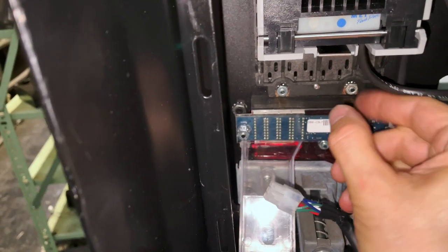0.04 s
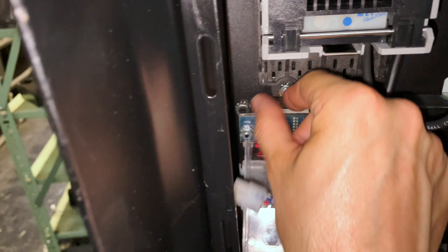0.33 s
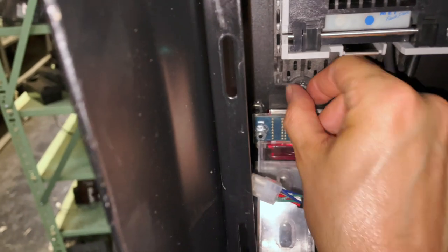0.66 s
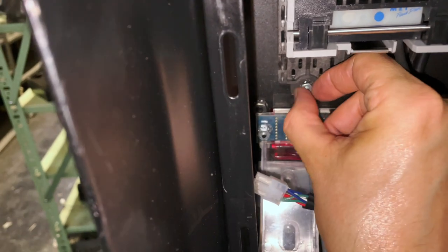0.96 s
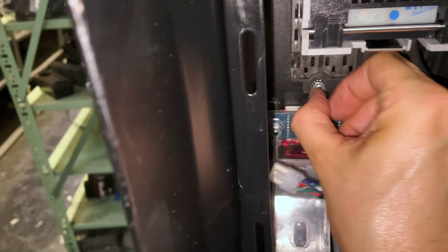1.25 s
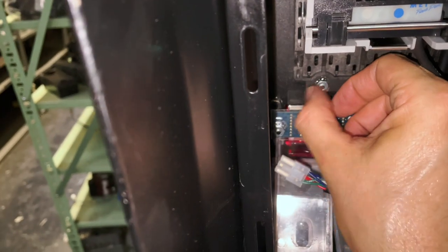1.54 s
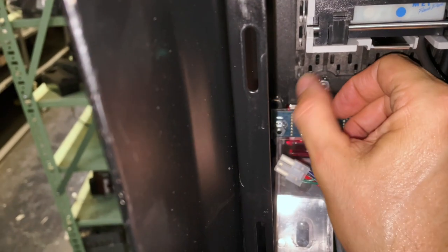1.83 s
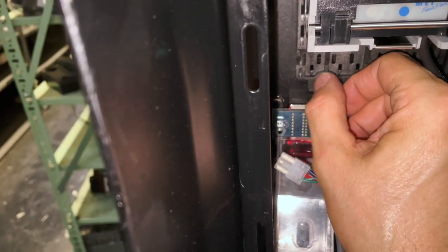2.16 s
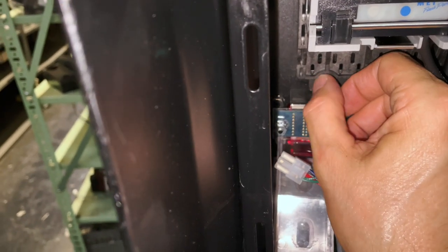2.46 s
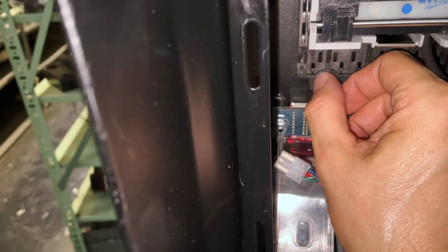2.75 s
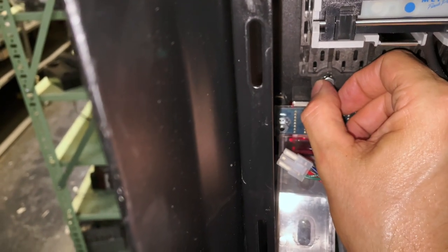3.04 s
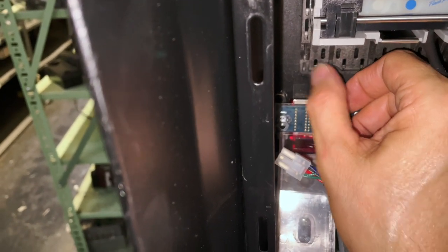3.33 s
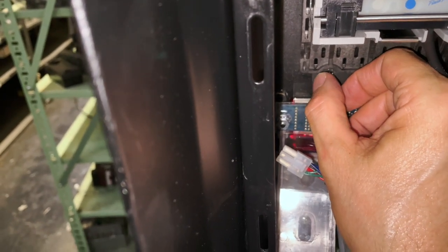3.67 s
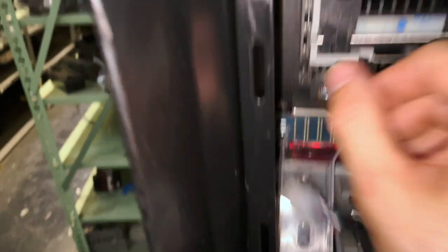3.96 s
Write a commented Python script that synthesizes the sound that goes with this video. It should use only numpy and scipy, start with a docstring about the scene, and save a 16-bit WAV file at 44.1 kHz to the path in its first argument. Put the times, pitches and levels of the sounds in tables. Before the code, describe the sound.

Close up, small metallic clicks and short scrapes come from a nut being threaded on by hand. Steel cabinet panels are brushed and knocked, fingertips squeak faintly, and the clicks grow sparse before a last bump, in a quietly humming workshop.

```python
"""Over a quiet workshop hum, fingers fit a small nut onto a screw inside a steel cabinet.
First the hand rubs and bumps the panels, which ring briefly, while the nut ticks and snaps. Its thread
rasps in short turns, and from about one second in the fingertips squeak on it. After a bright snap near
two seconds the turns and ticks thin out; a last rub and bump end the scene.
Two closely spaced microphones hear it all from near by."""
import sys
import numpy as np
from scipy import signal
from scipy.fft import rfft, irfft
from scipy.io import wavfile
from scipy.ndimage import uniform_filter1d

SR = 44100
rng = np.random.default_rng(int(sys.argv[2]) if len(sys.argv) > 2 else 0)


def wav_record(signal):
    """Record a signal, one row per channel, as 16-bit PCM in the file named by sys.argv[1]."""
    frames = np.transpose(np.atleast_2d(signal))
    bounded = np.clip(frames, -1, 1)
    # unit amplitude maps onto the largest positive 16-bit level
    quanta = np.round(bounded * 32767).astype(np.int16)
    wavfile.write(sys.argv[1], SR, quanta)


N = 176400
T = np.arange(N) / SR


def from_db(db):
    """Decibels to gain."""
    return 10 ** (np.asarray(db) / 20)


def rms_one(x):
    """Scale to unit rms."""
    return x / np.sqrt(np.mean(x ** 2) + 1e-20)


def decay(age, t60):
    """Envelope that falls 60 dB in t60 seconds."""
    return np.exp(-np.log(1000) * age / t60)


def at_hz(points, hz):
    """Read a curve on a log-frequency axis."""
    f, value = np.transpose(points)
    return np.interp(np.log(hz + 1), np.log(f), value)


def band(x, low_hz, high_hz):
    """Gentle band-pass."""
    sos = signal.butter(2, [low_hz, high_hz], "band", fs=SR, output="sos")
    return signal.sosfilt(sos, x + 1e-18)


def colour(x, spectrum):
    """Shape a noise with an EQ curve."""
    return irfft(rfft(x) * from_db(at_hz(spectrum, np.fft.rfftfreq(N, 1 / SR))), N)


def resonance(x, hz, t60):
    """One ringing mode, with gain 1 at its centre."""
    r = decay(1 / SR, t60)
    poles = [1, -2 * r * np.cos(2 * np.pi * hz / SR), r * r]
    return signal.lfilter((1 - r * r) / 2 * np.array([1, 0, -1]), poles, x + 1e-18)


def grains(per_s, spread_db):
    """Rough surfaces catching: tiny random impacts, made uneven by spread_db."""
    sizes = from_db(spread_db * np.minimum(rng.exponential(1, N), 4)) * rng.choice([-1, 1], N)
    return sizes * (rng.random(N) < per_s / SR)


def rustle(low_hz, high_hz, pitches=16, ring_cycles=17.3):
    """Many soft catches, each ringing briefly at one of a spread of pitches; rms 1."""
    catches = sum(resonance(grains(2000 / pitches, spread_db=2.5), hz, ring_cycles / hz) / np.sqrt(hz)
                  for hz in np.geomspace(low_hz, high_hz, pitches))
    return rms_one(band(catches, low_hz, high_hz))


def waver():
    """Quick irregular wobble of a part held in the fingers; rms 1."""
    return rms_one(band(rng.standard_normal(N), 33.3, 245))


def workshop():
    """A bed of distant machinery: rumble, a low hum and faint hiss."""
    # room tone spectrum: f/Hz, level/dB
    room_tone = [(20,-44),(35,-13),(58,5),(90,-5.5),(160,-13),(250,-19.5),(550,-35),(3000,-47),(7000,-54.5),(10500,-49),(15000,-61)]
    # its stereo width: f/Hz, side level/dB
    width = [(40,-26.5),(120,-9.5),(1500,-15)]
    mid, side = rng.standard_normal((2, N))
    air = colour(mid + colour(side, width) * [[1], [-1]], room_tone)
    hum = np.sin(2 * np.pi * 58.4 * T)
    return from_db(-49) * rms_one(air) + from_db(-52) * hum


def reflections(x, t60, band_hz):
    """A dense reverb tail, different at each microphone."""
    age = T[:SR // 2]
    tail = rng.standard_normal((2, len(age))) * decay(age, t60) * (age > .002)
    tail /= np.sqrt(np.sum(tail ** 2, axis=1, keepdims=True))
    return signal.fftconvolve(x[None], band(tail, *band_hz), axes=1)[:, :N]


def cabinet(x):
    """The steel box rings along at its modes."""
    # cabinet modes: f/Hz, level/dB, t60/s
    modes = [(518,5,0.176),(845,-1,0.18),(920,4.5,0.044),(2120,1,0.036),(3170,-0.5,0.015),(6424,-3.5,0.015)]
    return x + sum(from_db(db) * resonance(x, hz, t60) for hz, db, t60 in modes)


def sheet_metal(x):
    """Countless close, short resonances of the sheet give the contacts a tinny colour."""
    age = T[:SR // 8]
    ringing = rng.standard_normal(len(age)) * decay(age, t60=0.0055)
    response = from_db(3) * band(ringing / np.linalg.norm(ringing), 2170, 13600)
    response[0] += 1   # the direct sound
    spectrum = rfft(response)
    spectrum /= np.sqrt(uniform_filter1d(np.abs(spectrum) ** 2, size=100))   # keep the broad balance flat
    return signal.fftconvolve(x, irfft(spectrum)[:len(age) // 2])[:N]


def hand_rubs(fade_s=0.013):
    """Skin drags over the panels with a dull, grainy rustle."""
    # one envelope per rub, its points: t/s, bass level/dB, middle level/dB
    strokes = [
        [(0.0, -98, -50), (0.11, -31.5, -45.5), (0.47, -49.5, -75)],
        [(0.52, -45.5, -49), (0.7, -51, -68.5), (0.72, -48, -51)],
        [(0.92, -51.5, -62), (1.14, -46.5, -51.5), (1.42, -39.5, -74)],
        [(1.56, -46, -103), (1.716, -52.5, -57.5), (1.85, -44, -87)],
        [(3.78, -56, -64), (3.846, -48, -54), (4.0, -51.5, -51.5)],
    ]
    # bass, middle and treble of the rustle: low f/Hz, high f/Hz, trim/dB
    layers = [(54,265,-4.5),(377,1630,0),(1550,7660,-12.5)]
    out = np.zeros(N)
    for k, (low_hz, high_hz, trim_db) in enumerate(layers):
        envelope = 0
        for stroke in strokes:
            times, bass_db, middle_db = np.transpose(stroke)
            db = np.interp(T, times, bass_db if k == 0 else middle_db)   # the treble follows the middle
            outside_s = np.maximum(times[0] - T, T - times[-1]).clip(0)
            envelope += from_db(db + trim_db) * (1 - outside_s / fade_s).clip(0)
        out += envelope * rustle(low_hz, high_hz)
    return out


def bumps(rise_share=0.12):
    """A touched panel or small part rings briefly; the fingers damp it and bend its pitch."""
    # parts set ringing: t/s, f/Hz, level/dB, t60/s
    rings = [(.046,925,-20,0.018),(.097,420,-23,0.058),(0.1,173,-18,0.062),(0.0983,1630,-15.5,0.015),(0.167,1590,-30,.025),(0.213,1694,-21,0.014),(.219,827,-31.5,0.24),(0.331,847,-22,0.036),(.338,397,-29.5,0.06),(0.538,390,-17,0.027),(0.599,409,-17.5,0.018),(1.075,2137,-25,0.018),(1.162,3437,-26,0.024),(1.32,327,-28.5,0.07),(1.566,190.4,-28,0.2),(1.572,525,-44.5,0.21),(3.852,1470,-16.5,0.011),(3.851,960,-21.5,0.015),(3.946,4020,-50,0.082)]
    out = np.zeros(N)
    bend = 1 + 0.012 * waver()
    for s, hz, db, t60 in rings:
        start = int(s * SR)
        age = T[:N - start][:SR // 3]
        span = slice(start, start + len(age))
        envelope = (1 - np.exp(-age / (rise_share * t60))) * decay(age, t60)
        out[span] += from_db(db) * envelope * np.sin(2 * np.pi * hz * np.cumsum(bend[span]) / SR)
    return out


def finger_squeaks():
    """Skin sticks and slips on the nut: a rough tone that glides down as the grip changes."""
    # fingertip slips: t/s, length/s, first f/Hz, last f/Hz, level/dB
    slips = [(0.953,0.1,1936,1730,-56),(0.978,0.14,1365,1156,-50.5),(1.211,.055,1690,1160,-41.5),(1.275,0.05,1100,868,-52.5)]
    out = np.zeros(N)
    wobble = 1 + .05 * waver()
    for s, length, first_hz, last_hz, db in slips:
        progress = ((T - s) / length).clip(0, 1)
        hz = first_hz * (last_hz / first_hz) ** progress * wobble
        envelope = np.sin(np.pi * np.sqrt(progress))
        out += from_db(db) * envelope * np.sin(2 * np.pi * np.cumsum(hz) / SR)
    return out * (1 + .5 * waver())   # the level flutters


def nut_snaps(t60=0.004):
    """The nut's edge lets go of the thread with a tiny, very bright crack."""
    # snaps over the thread: t/s, level/dB
    snaps = [(0.085,-34),(0.296,-14),(0.882,-24),(0.955,-35),(1.486,-35),(1.9103,-15)]
    envelope = sum(from_db(db - 60 * ((T - s) / t60).clip(0, 2)) * (T >= s) for s, db in snaps)
    return band(envelope * rng.standard_normal(N), 10000, 16300)


def thread_rasp():
    """The thread catches and sets the nut ringing; the rasp swells and dies with each turn."""
    # turns of the nut: peak t/s, rise/s, fall/s, level/dB
    turns = [(0.089,0.012,0.036,-48),(.268,0.012,0.015,-44),(0.581,0.016,0.014,-49),(0.761,0.063,0.035,-55.5),(0.873,0.0056,0.0082,-50),(1.008,0.052,0.023,-52.5),(1.221,0.045,0.029,-46),(1.464,0.01,0.018,-47.5),(1.554,0.0046,0.0099,-36.5),(1.752,0.014,0.016,-43.5),(1.799,0.023,0.0074,-52.5),(1.968,0.029,0.015,-44),(2.054,0.008,0.016,-56.5),(2.239,0.012,0.013,-40),(2.348,.004,.012,-62),(2.532,0.014,0.021,-45.5),(2.625,0.0072,.015,-62.5),(2.819,0.02,0.021,-47.5),(3.198,0.0097,0.01,-56),(3.39,0.0074,0.058,-61)]
    # spectrum of the thread's grit: f/Hz, level/dB
    grit_eq = [(400,-17),(950,0),(1600,0.5),(2700,-11),(4000,-4.5),(6500,-10),(8200,-15.5),(10800,-5),(15500,-31)]
    effort = sum(from_db(db) * np.exp(-np.maximum((s - T) / rise, (T - s) / fall).clip(0, 20))
                 for s, rise, fall, db in turns)
    grit = rms_one(colour(grains(per_s=4000, spread_db=1.5), grit_eq))
    nut_ring = rustle(813, 5520)
    return effort * rms_one(grit + nut_ring)


def nut_ticks(attack_s=0.00029):
    """Each metal contact is a burst of chatter whose highs die fastest."""
    # contacts: t/s, treble level/dB, then relative to it body/dB, middle/dB, top/dB
    contacts = [(0.0159, -44.5, -1, 2.5, -10.5), (0.0455, -44, 1, 5.5, -36),
                (0.0849, -17, -12.5, -21.5, -17.5), (0.0934, -29, -26, 2, -13),
                (0.2107, -29, -3.5, 3.5, -43), (0.2275, -36, -1, 2.5, -42), (0.297, -20, -26, -19.5, -9.5),
                (0.329, -34.5, 2, -1, -31), (0.5039, -49.5, 4.5, 7.5, -12),
                (0.525, -38.5, -6.5, -10.5, -22), (0.8793, -35, -7.5, -3, -16),
                (0.9832, -31.5, -10.5, -19, -21), (1.074, -30, -35, -11, -44),
                (1.2192, -22.5, -17.5, -23, -18), (1.2982, -41.5, 2.5, 1, -41),
                (1.3794, -33.5, -48, -10.5, -51), (1.454, -33.5, -13.5, -10.5, -44),
                (1.465, -40.5, -35, 0, -35), (1.5498, -19.5, -14, -11, -21),
                (1.648, -39.5, -9.5, -4.5, -23), (1.7413, -30, -14, -12.5, -18.5),
                (1.9084, -28.5, -15, -10, -2.5), (2.175, -60.5, -21, 11, -32), (2.4553, -49, -24, 4, -46),
                (2.7273, -41.5, -12, -7, -18), (2.819, -31.5, -22, -12.5, -42.5),
                (3.262, -47.5, -5, 4, -33), (3.369, -45, -34, -4.5, -35), (3.68, -46.5, -43, -7.5, -30),
                (3.706, -44.5, -49, -4.5, -50), (3.8472, -37, -6, -6.5, -14.5), (3.945, -44, 2.5, -15, -25)]
    # body, middle, treble and top: low f/Hz, high f/Hz, trim/dB, t60/s
    layers = [(250, 700, -5, 0.23), (700, 2000, -1.5, 0.071),
              (2000, 7300, -10, 0.06), (8800, 12500, 5.5, 0.024)]
    out = np.zeros(N)
    for k, (low_hz, high_hz, trim_db, t60) in enumerate(layers):
        power = np.zeros(N)
        for s, db, body_db, middle_db, top_db in contacts:
            start = int(s * SR)
            age = T[:N - start][:SR // 2]
            gain = from_db(db + (body_db, middle_db, 0, top_db)[k])
            envelope = (1 - np.exp(-age / attack_s)) * decay(age, t60)
            power[start:start + len(age)] += (gain * envelope) ** 2
        chatter = grains(per_s=5000, spread_db=0)
        bursts = band(chatter * np.sqrt(power), low_hz, high_hz)
        out += from_db(trim_db) * bursts / band(chatter, low_hz, high_hz).std()
    return out


def scene():
    """Close handling sounds reflect inside the cabinet and around the room, over the workshop bed."""
    contacts = nut_ticks() + thread_rasp() + hand_rubs()
    near = cabinet(sheet_metal(contacts)) + bumps() + nut_snaps() + finger_squeaks()
    inside = from_db(-5) * reflections(near, t60=0.051, band_hz=(784, 2560))
    room = from_db(-8) * reflections(near, t60=0.28, band_hz=(181, 3020))
    return near + inside + room + workshop()


def record(dry):
    """A close microphone pair: unequal phase and level, a soft treble roll-off and a steep top cut."""
    # left microphone's phase lead over the right: f/Hz, phase/rad
    left_lead = [(1600,-.1),(2700,1),(3700,.1),(5200,.2),(6900,-1.3),(8100,-3.14),(11700,-6.2),(15000,-9.4)]
    # left microphone's level over the right: f/Hz, level/dB
    left_louder = [(150,-1.5),(400,1),(2200,2),(4500,8),(8000,-6.5),(14000,4.5)]
    hz = np.fft.rfftfreq(2 * N, 1 / SR)
    half = np.array([[.5], [-.5]])
    pair = from_db(half * at_hz(left_louder, hz)) * np.exp(1j * half * at_hz(left_lead, hz))
    heard = irfft(rfft(dry, 2 * N) * pair)[:, :N]
    softened = signal.sosfilt(signal.butter(2, 10930, fs=SR, output="sos"), heard)
    return signal.sosfilt(signal.ellip(10, .1, 80, 15800, fs=SR, output="sos"), softened)


dry = scene()
out = record(dry)
wav_record(out)
```